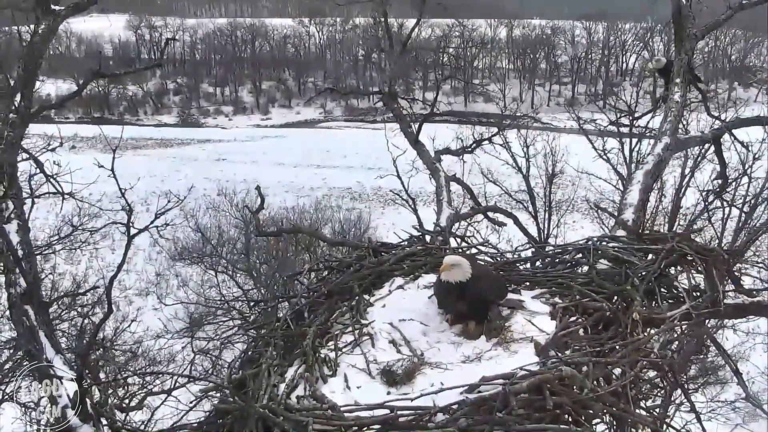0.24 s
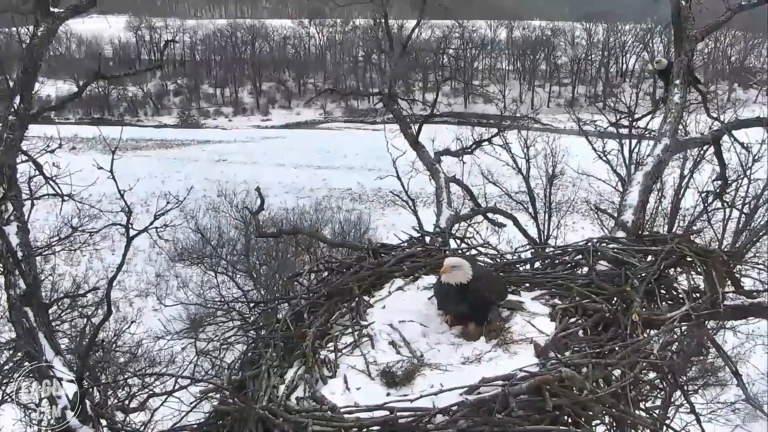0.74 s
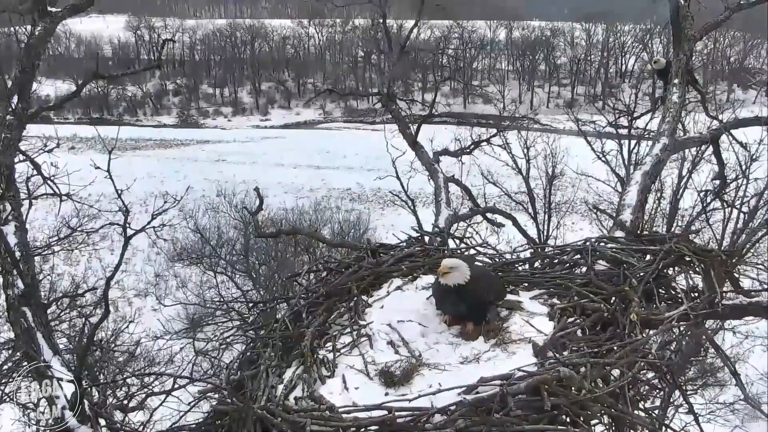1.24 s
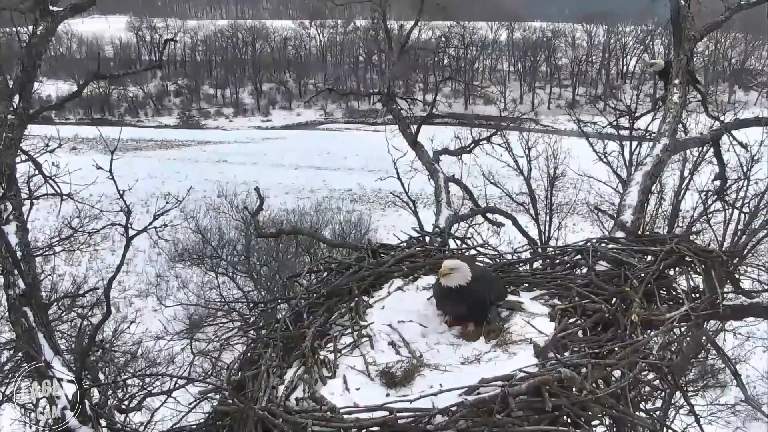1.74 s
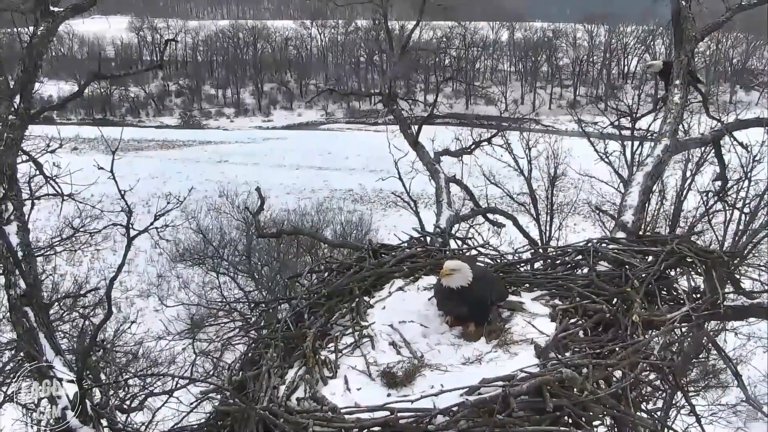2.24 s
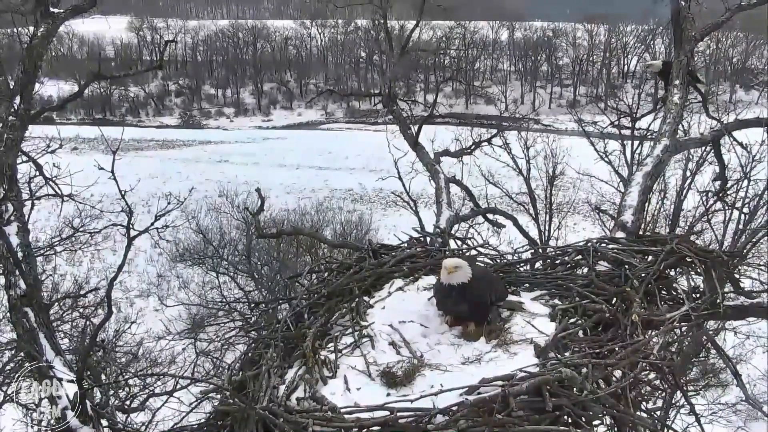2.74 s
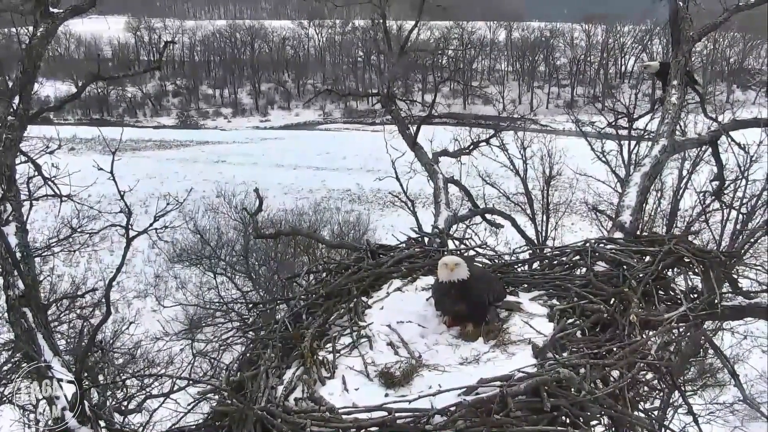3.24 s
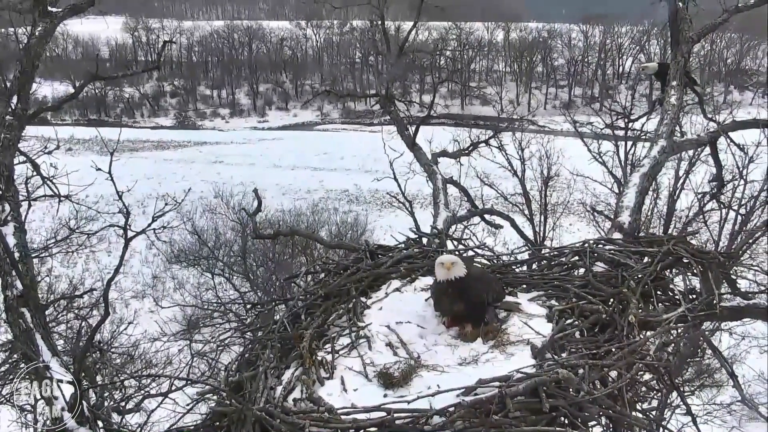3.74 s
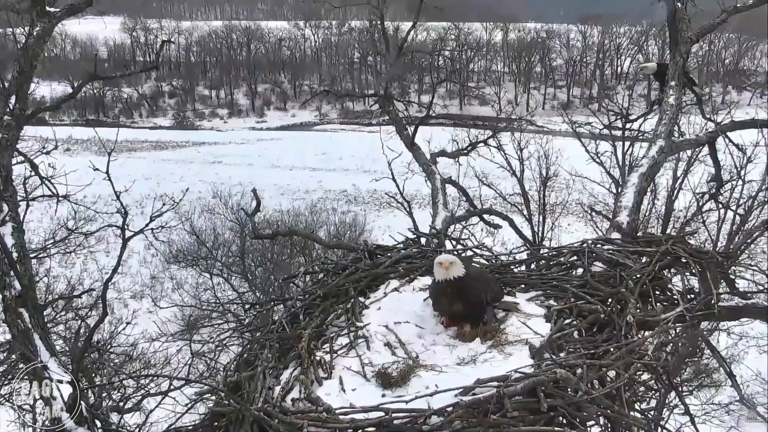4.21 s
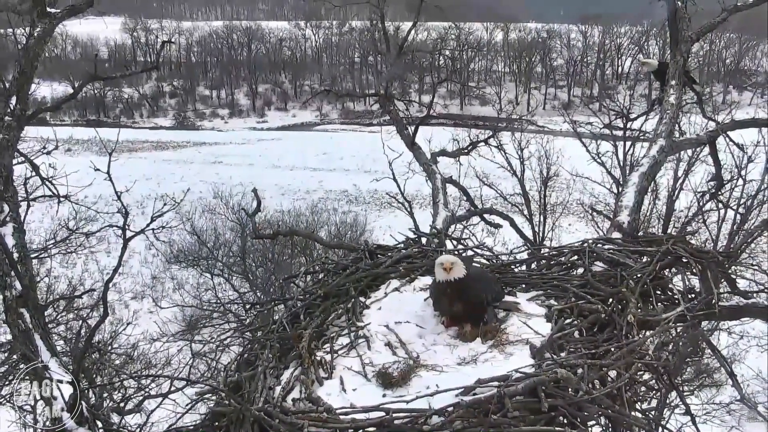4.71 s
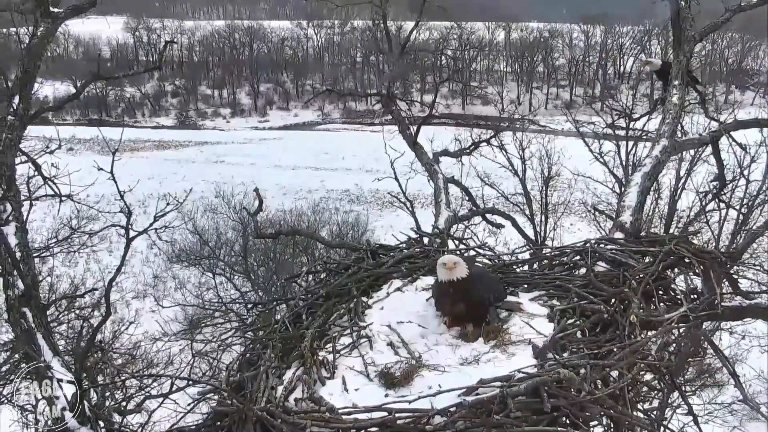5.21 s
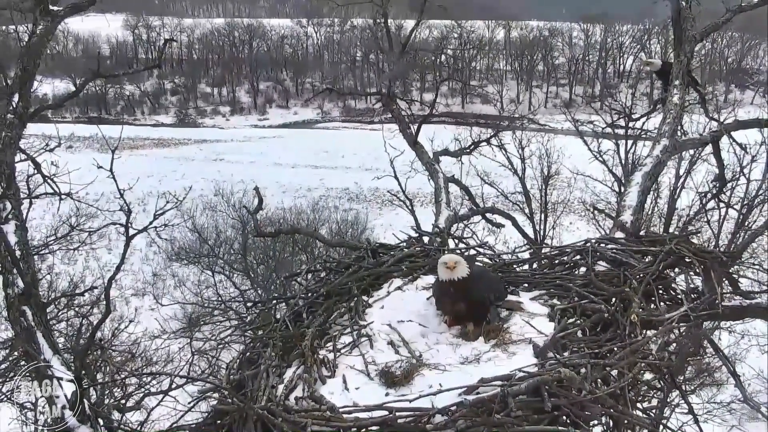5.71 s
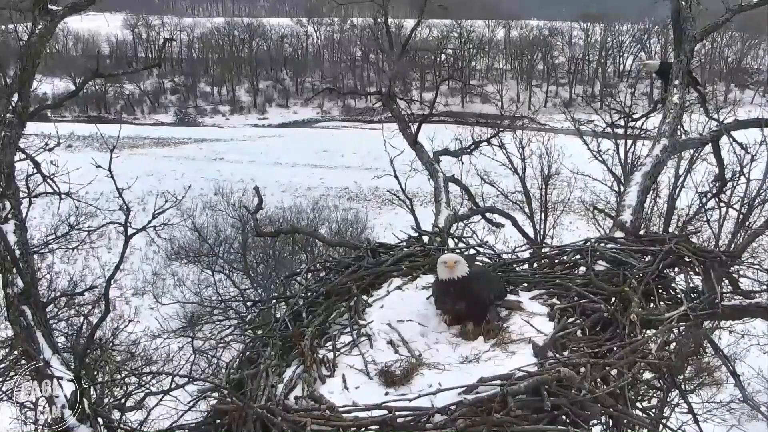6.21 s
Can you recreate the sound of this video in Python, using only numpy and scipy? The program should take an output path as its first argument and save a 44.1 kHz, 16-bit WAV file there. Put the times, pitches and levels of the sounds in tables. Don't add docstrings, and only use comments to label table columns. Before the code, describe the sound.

High thin chirps tumble downward in three series while a second eagle gives four rough, reedy squeals, with low wind buffeting the microphone.

```python
import sys
import numpy as np
from scipy import signal
from scipy.fft import rfft, irfft, next_fast_len
from scipy.io import wavfile
from scipy.ndimage import uniform_filter1d

SR = 44100
rng = np.random.default_rng(int(sys.argv[2]) if len(sys.argv) > 2 else 0)


def transcribe(signal):
    frames = np.atleast_2d(signal).T
    limited = np.clip(frames, -1, 1)
    pcm = np.round(limited * 32767).astype(np.int16)
    wavfile.write(sys.argv[1], SR, pcm)


def field_ratio(decibels):
    return 10 ** (np.asarray(decibels, dtype=float) / 20)


N = 284886
TIME = np.arange(N) / SR

REGISTER_HZ, FEEBLE_HZ = 3500, 2400


def rms_one(x):
    return x / np.sqrt(np.mean(x ** 2) + 1e-20)


def at_hz(points, hz):
    point_hz, point_db = np.array(points)[:, 0], np.array(points)[:, 1]
    return np.interp(np.log(hz), np.log(point_hz), point_db)


def coloured(spectrum):
    size = next_fast_len(N)
    hz = np.arange(1, size // 2 + 2) * SR / size
    closed = [(spectrum[0][0] / 2, -60)] + list(spectrum) + [(spectrum[-1][0] * 1.5, -90)]
    white = rfft(rng.standard_normal(size))
    return rms_one(irfft(white * field_ratio(at_hz(closed, hz)), size)[:N])


def drift(rate_hz, size):
    r = np.exp(-2 * np.pi * rate_hz / SR)
    settle = 8000
    wander = signal.lfilter([1], [1, -2 * r, r * r], rng.standard_normal(size + settle))
    return rms_one(wander[settle:])


def delayed(x, delay_s):
    lag = int(delay_s * SR)
    return np.concatenate([np.zeros(lag), x[:N - lag]])


def band(x, order, low_hz, high_hz):
    return signal.sosfilt(signal.butter(order, [low_hz, high_hz], "band", fs=SR, output="sos"), x)


def wind():
    # t/s, level/dB
    gusts = [(0, -33), (.1, -31.5), (.5, -34.5), (.72, -42), (1.0, -26), (1.17, -27.5), (1.5, -30),
             (1.9, -28.5), (2.1, -35), (2.7, -41.5), (3.5, -38.5), (4.05, -39.5), (4.17, -29.5),
             (4.28, -40), (5.1, -42.5), (5.7, -39), (6.05, -45), (6.3, -50)]
    # f/Hz, level/dB per Hz
    rumble_spectrum = [(7.1, -48.5), (12, -8), (43, 6), (61, 1), (110, -9.5), (140, -32.5), (240, -120)]
    buffet_spectrum = [(35, -32.5), (60, 0.5), (103, -0.5), (182, -13.5), (400, -32.5), (520, -58.5),
                       (880, -120)]
    air_spectrum = [(88, -17), (150, -5), (244, -6.5), (430, -11), (456, -12.5), (493, -11.5), (686, -14),
                    (1230, -21.5), (1330, -21.5), (2390, -30.5), (4050, -37), (5110, -42), (15800, -53.5)]
    rumble_db, buffet_db, air_db = -2, -41, -50.5
    buffet_follows, air_follows = 0.53, .25
    eddy_db, eddies_per_s = 1.5, 5

    gust_db = np.interp(TIME, *np.transpose(gusts))
    swing_db = gust_db - gust_db.mean()
    rumble_level = gust_db + rumble_db + eddy_db * drift(eddies_per_s, N)
    buffet_level = buffet_db + buffet_follows * swing_db + eddy_db * drift(eddies_per_s, N)
    air_level = air_db + air_follows * uniform_filter1d(swing_db, size=SR, mode="nearest")
    rumble = field_ratio(rumble_level) * coloured(rumble_spectrum)
    buffet = field_ratio(buffet_level) * coloured(buffet_spectrum)
    air = field_ratio(air_level) * coloured(air_spectrum)
    return rumble + buffet + air


def squeal(rows, near_db, manner, share, blur, wander, jitter, flicker_db, breath_db):
    # f/Hz, level/dB
    harmonic_tops = [(1200, -3.5), (2400, 3), (3700, -12), (4900, -17), (6100, -22.5), (7400, -39.5),
                     (8600, -57), (9800, -51.5), (11200, -57.5), (14000, -65)]
    side_tops = [(560, -13.5), (1200, -16.5), (1800, 2), (2400, -11), (3100, -6), (4300, -12.5),
                 (5500, -11), (6800, -19.5), (8000, -34), (10000, -40.5), (14000, -58)]
    # start/s, end/s, boost/dB
    locks = [(4.49, 4.513, 12.5), (4.533, 4.574, 7.5), (4.6, 4.659, 7), (4.678, 4.68, 6.5),
             (4.761, 4.79, 5), (4.809, 4.873, 4.5), (4.911, 4.96, 4), (4.977, 5.03, 3.5), (5.632, 5.7, 3.5),
             (5.727, 5.8, 3)]
    lower_side_db, second_side_db, second_side_power = -3.5, -9.0, 0.88
    side_lean_db = 2.5
    side_start_db, bright_start_db = -26, 1.3
    swell_in_s, third_climb_db, rasp_db = .04, 7.5, -40
    collapse_s, collapse_side_db, collapse_dull_db = .035, -5, -14
    wobble, wobbles_per_s = .0028, 16

    s, pitch_hz, level_db = np.transpose(rows)
    side_db, join_s, third_db, early_db, late_db = manner
    span = slice(int(s[0] * SR), int(s[-1] * SR))
    t = TIME[span]
    size = len(t)
    joined = np.clip((t - s[0] - join_s) / swell_in_s, 0, 1)
    failing = np.clip(1 - (s[-1] - t) / collapse_s, 0, 1)

    pitch = uniform_filter1d(np.interp(t, s, pitch_hz), size=400)
    pitch = pitch * (1 + 0.0016 * drift(60, size) + wobble * drift(wobbles_per_s, size))
    slow = pitch * (share + wander * drift(40, size))
    main_phase = 2 * np.pi * np.cumsum(pitch) / SR
    slow_phase = 2 * np.pi * np.cumsum(slow) / SR + jitter * drift(140, size)

    side = side_start_db + (side_db - side_start_db) * joined
    side += (collapse_side_db - side) * failing
    side += flicker_db * np.tanh(drift(56, size))
    locked = sum(boost_db * ((t > start) & (t < end)) for start, end, boost_db in locks)
    side += uniform_filter1d(locked * 1.0, size=200) - np.mean(locked)
    second = second_side_power * side + second_side_db
    side_lines = [(1, side), (-1, side + lower_side_db), (2, second), (-2, second)]

    bright_db = np.interp(t, [s[0], s[-1]], [early_db, late_db])
    bright = bright_start_db + (bright_db - bright_start_db) * joined + collapse_dull_db * failing
    third = third_db + third_climb_db * ((t - s[0]) / (s[-1] - s[0]) - .5)
    shake = blur * np.sqrt(field_ratio(np.minimum(side, 0))) * drift(110, size)

    sound = np.zeros(size)
    for k in range(12):
        phase = k * main_phase + k * k + max(k - 2.6, 0) * shake
        tilt = bright * np.log2(max(k, 3) / 3)
        tilt = tilt + .5 * k * np.tanh(drift(25, size))
        lean = side_lean_db * np.clip(k - 2, 0, 3)
        for j, db in side_lines[:4 if k else 1]:
            tops = at_hz(side_tops, np.abs(k * pitch + j * slow))
            sound += field_ratio(db + tops + tilt - lean * np.sign(j)) * np.sin(phase + j * slow_phase)
        if k:
            lift = third * (k == 3)
            rasp = 1 + field_ratio(rasp_db) * np.sqrt(k) * drift(230, size)
            sound += rasp * field_ratio(at_hz(harmonic_tops, k * pitch) + tilt + lift) * np.sin(phase)

    sound += field_ratio(uniform_filter1d(side, size=1500) + breath_db) * coloured(side_tops)[span]
    fade = np.clip(np.minimum(t - s[0], s[-1] - t) / .008, 0, 1)
    out = np.zeros(N)
    out[span] = np.sqrt(2) * sound * field_ratio(np.interp(t, s, level_db) + near_db) * fade
    return out


def long_squeals():
    # t/s, f/Hz, level/dB
    contours = [
        [(1.176, 1130, -60), (1.198, 1150, -38), (1.234, 1118, -41), (1.278, 1149, -39), (1.33, 1149, -38),
         (1.425, 1139, -39.5), (1.536, 1152, -41.5), (1.554, 1098, -47), (1.57, 1060, -66)],
        [(1.905, 1185, -62), (1.923, 1187, -30.5), (1.967, 1144, -38), (2.01, 1178, -34.5), (2.07, 1208, -34),
         (2.15, 1234, -33.5), (2.303, 1241, -32.5), (2.322, 1215, -36), (2.341, 1110, -56)],
        [(4.41, 1095, -58), (4.44, 1180, -35), (4.476, 1175, -35), (4.504, 1212, -33.5), (4.66, 1217, -31),
         (4.84, 1243, -31.5), (5.02, 1236, -32), (5.038, 1195, -33.5), (5.068, 1010, -50)],
        [(5.424, 1214, -52), (5.438, 1216, -31), (5.466, 1220, -31), (5.49, 1180, -32), (5.52, 1210, -32),
         (5.64, 1215, -31.5), (5.745, 1245, -31), (5.81, 1232, -32), (5.833, 1120, -50)],
    ]
    near_levels = [0.1, 0.13, 0.1, 0.1]
    # second voice/dB against the first, wait before it joins/s, third harmonic lift/dB,
    # brightness early/dB per octave, brightness late/dB per octave
    manners = [(-6, 0.086, -2, -9.5, -14.5), (-7.5, .01, 2, -22.5, -4), (-20.5, 0.043, 2, 3, 1),
               (-18.5, 0.082, 2.5, -3.5, 2.5)]
    shares = [.459, .453, .4995, .47]
    blurs = [.4, .55, .2, .3]
    # wander of its share [ratio], phase jitter/rad, flicker/dB, breath/dB
    unrests = [(.003, .25, 2, -17.0), (.003, .3, 2, -15.0), (.003, .45, 2.5, -14.0),
               (.015, .55, 4.5, -14.0)]

    calls = zip(contours, near_levels, manners, shares, blurs, unrests)
    return sum(squeal(*call, *unrest) for *call, unrest in calls)


def woods(x):
    t60_s, gap_s = 0.91, 0.033
    t = TIME[:SR]
    noise = rng.standard_normal(SR)
    dull = signal.lfilter([.45], [1, -.55], noise)
    tail = dull * field_ratio(-60 * t / t60_s) + 0.23 * noise * field_ratio(-60 * t / (0.13 * t60_s))
    tail = tail / np.sqrt(np.sum(tail ** 2))
    return delayed(signal.fftconvolve(x, tail)[:N], gap_s)


def hill(x):
    delay_s, spread_s, level_db = .08, .16, -32
    dulled = band(x, 2, 1900, 3000)
    scatter = rng.standard_normal(SR // 4) * np.exp(-TIME[:SR // 4] / spread_s)
    scatter = scatter / np.sqrt(np.sum(scatter ** 2))
    return field_ratio(level_db) * delayed(signal.fftconvolve(dulled, scatter)[:N], delay_s)


def leads():
    # t/s, peak level/dB, from f/Hz, to f/Hz, length/s
    lead_rows = [
        (1.292, -45, 3850, 4386, 0.014),
        (3.170, -54.5, 3370, 3280, .011),
        (3.186, -46.5, 3310, 4700, 0.017),
        (5.905, -41, 3770, 4570, 0.0072),
    ]
    lead_octaves = [1, -12, -13, -28]
    # t/s, peak level/dB, length/s
    grace_rows = [
        (1.375, -35, .013),
        (1.499, -31, 0.0068),
        (3.301, -34.5, 0.01),
        (3.425, -37, 0.0073),
        (5.657, -31.5, 0.022),
        (5.78, -34, 0.011),
    ]
    grace_from_hz, grace_to_hz, grace_octave_db = 4900, 4350, -30
    rough_db, waver_depth, breath_db = 4, .015, -17

    climbs = [(*row, octave_db, 1.1) for row, octave_db in zip(lead_rows, lead_octaves)]
    drops = [(s, db, grace_from_hz, grace_to_hz, length, grace_octave_db, 1.7) for s, db, length in grace_rows]
    out = np.zeros(N)
    for s, peak_db, from_hz, to_hz, length, octave_db, bend in climbs + drops:
        along = np.arange(int(length * SR)) / (length * SR)
        waver = drift(300, SR // 20)[:len(along)]
        rough = drift(350, SR // 20)[:len(along)]
        breath = band(rng.standard_normal(SR // 20), 2, 1500, 5500)[-len(along):]
        pitch = (from_hz + (to_hz - from_hz) * along ** bend) * (1 + waver_depth * waver)
        phase = 2 * np.pi * np.cumsum(pitch) / SR
        shape = field_ratio(peak_db + rough_db * np.tanh(rough)) * np.sqrt(np.sin(np.pi * along))
        whistle = np.sin(phase) + field_ratio(octave_db) * np.sin(2 * phase) + field_ratio(breath_db) * breath
        out[int(s * SR):][:len(along)] += shape * whistle
    return out


def quick_echoes(x):
    # delay/s, level/dB
    bounces = [(0.012, -2), (0.02, -10.5), (.031, -19.5), (0.044, -34)]
    bounced = band(x, 3, 2500, 11000)
    return sum(field_ratio(db) * delayed(bounced, delay_s) for delay_s, db in bounces)


def phrasing():
    # t/s, peak level/dB, held f/Hz, length/s
    bouts = [
        [(1.397, -33, 3980, 0.021), (1.508, -24.5, 3964, 0.015), (1.630, -21.5, 3874, 0.01),
         (1.754, -26, 3164, 0.0077), (1.882, -30.5, 3060, 0.0071), (2.014, -37, 2920, .009),
         (2.142, -43, 2760, .01)],
        [(3.197, -30.5, 3935, .03), (3.312, -30, 3930, 0.026), (3.436, -28, 3920, 0.016),
         (3.565, -28.5, 3205, 0.016), (3.705, -30.5, 3117, .01), (3.852, -33.5, 2986, 0.026),
         (4.01, -33, 2875, 0.013), (4.164, -43, 2130, 0.0051), (4.309, -32, 1885, 0.0061)],
        [(5.571, -31.5, 3097, 0.016), (5.681, -26, 3900, 0.01), (5.792, -27.5, 3856, 0.02),
         (5.912, -31, 3838, 0.023), (6.042, -27.5, 3172, 0.0097), (6.161, -29.5, 3002, 0.01),
         (6.283, -34, 2920, 0.0079), (6.41, -43, 2737, 0.014)],
    ]
    # octave in the high register/dB, octave in the low/dB, crack/dB
    octaves = [(-12.5, -9.5, -3.5), (-24, -13, -7), (-20, -13, -3)]
    # f/Hz, level under the note/dB, length/s
    break_catches = [(2030, -31.5, 0.015), (2920, -28, 0.0089), (7260, -26.5, 0.0068)]
    high_onset, break_onset = 1.1, .91
    low_onset_hz, feeble_octave_db = 2360, -18
    catch_hz, catch_db, catch_under_db, catch_lead_s, catch_s = 2045, -50.5, -13.5, .003, 0.0018
    catch_stretch = 5.5

    notes, openings = [], []
    for bout, (high_db, low_db, crack_db) in zip(bouts, octaves):
        last_high = max(s for s, db, hz, length in bout if hz > REGISTER_HZ)
        for s, db, hz, length in bout:
            if hz > REGISTER_HZ:
                onset = break_onset if s == last_high else high_onset
                notes.append((s, db, hz * onset, hz, length, high_db))
                if s == last_high:
                    for crack_hz, under_db, held in break_catches:
                        openings.append((s - held / 2, db + under_db + crack_db, crack_hz, held))
            elif hz > FEEBLE_HZ:
                notes.append((s, db, low_onset_hz, hz, length, low_db))
                level_db = min(catch_db, db + catch_under_db)
                catch_length = catch_s * max(3200 / hz, 1) ** catch_stretch
                openings.append((s - catch_lead_s, level_db, catch_hz, catch_length))
            else:
                notes.append((s, db, catch_hz, hz, length, feeble_octave_db))
    return notes, openings


def chirps(strokes):
    scoop_s, base_third_db, clack_db = .0011, -32.5, -15
    out = np.zeros(N + SR)
    t = np.arange(int(.07 * SR)) / SR
    for s, peak_db, onset_hz, held_hz, length, octave_db in strokes:
        pitch = held_hz + (onset_hz - held_hz) * np.exp(-t / scoop_s)
        pitch *= 1 - 0.012 * (t / length) ** 2 * (t < 2 * length)
        phase = 2 * np.pi * np.cumsum(pitch * (1 + 0.011 * drift(84, len(t)))) / SR
        third_db = 0.25 * min(octave_db, -6) + base_third_db - 7.0 * np.log2(held_hz / 3500)
        tone = np.sin(phase) + field_ratio(octave_db) * np.sin(2 * phase)
        tone += field_ratio(third_db) * np.sin(3 * phase)
        tone += field_ratio(third_db - 14.0) * np.sin(4 * phase)
        attack = 1 - np.exp(-(t / 0.0018) ** 2)
        shape = attack / (1 + np.exp(np.minimum((t - length) / 0.0017, 50)))
        swell = field_ratio(2.2 * np.tanh(drift(120, len(t))))
        hiss = np.diff(rng.standard_normal(len(t) + 1))
        clack = (held_hz > FEEBLE_HZ) * field_ratio(clack_db) * hiss * np.exp(-t / 0.0056)
        clack = band(clack, 4, 1700, 5500)
        at = int(s * SR)
        out[at:at + len(t)] += field_ratio(peak_db + 3.5) * (tone * shape * swell + clack)
    return out[:N]


def catches(cracks):
    out = np.zeros(N + SR)
    for s, peak_db, hz, length in cracks:
        t = np.arange(int(2 * length * SR)) / SR
        pitch = hz * (1 + .08 * t / length + .04 * drift(500, len(t)))
        phase = 2 * np.pi * np.cumsum(pitch) / SR
        tone = np.sin(phase) + field_ratio(-20) * np.sin(2 * phase) + field_ratio(-28) * np.sin(3 * phase)
        shape = np.sin(np.pi * np.sqrt(t / (2 * length))) ** 2
        at = int(s * SR)
        out[at:at + len(t)] += field_ratio(peak_db + 13.5) * tone * shape
    return out[:N]


def scene():
    weather = wind()
    long_calls = long_squeals()
    thin = leads()
    strokes, cracks = phrasing()
    held, openings = chirps(strokes), catches(cracks)
    echoes = quick_echoes(held + thin)
    far = woods(field_ratio(-20) * (held + openings) + field_ratio(-26) * thin + field_ratio(-36) * long_calls)
    birds = long_calls + held + thin + openings
    return (birds + echoes + far + hill(long_calls) + weather)[None]


def top_cut(x):
    return signal.sosfilt(signal.butter(12, 15990, fs=SR, output="sos"), x)


def record(dry):
    return top_cut(dry)


dry = scene()
out = record(dry)
transcribe(out)
```